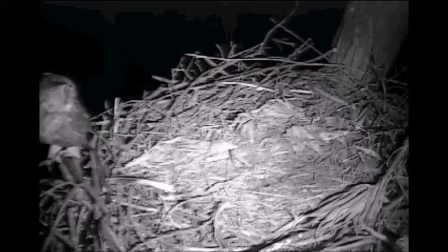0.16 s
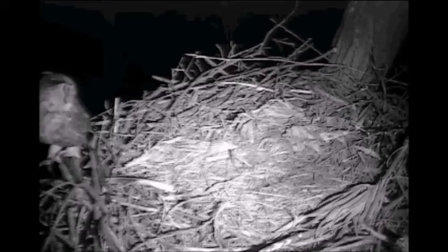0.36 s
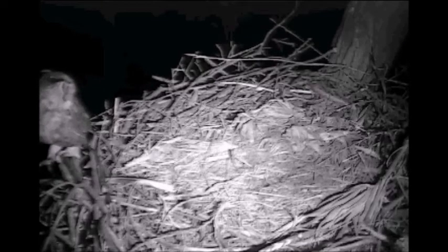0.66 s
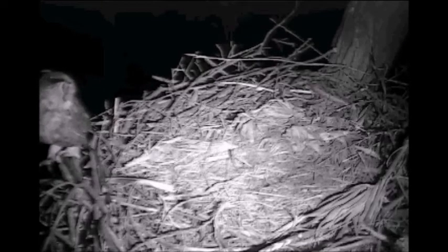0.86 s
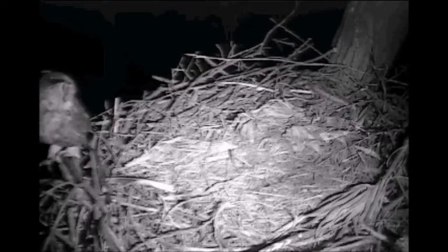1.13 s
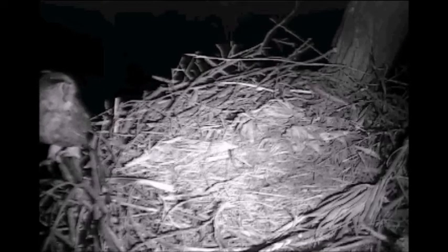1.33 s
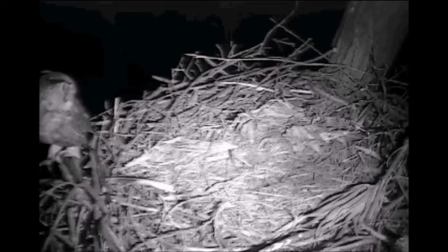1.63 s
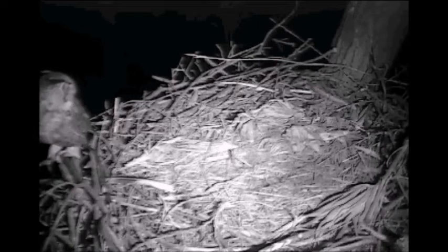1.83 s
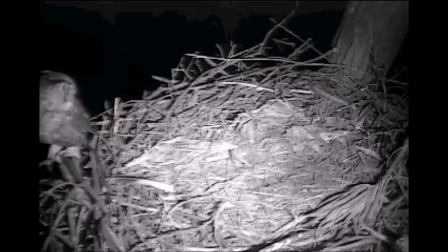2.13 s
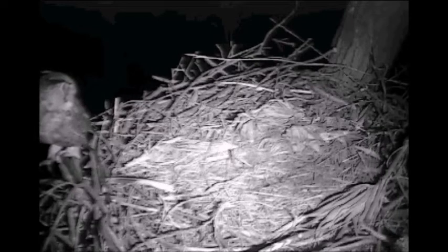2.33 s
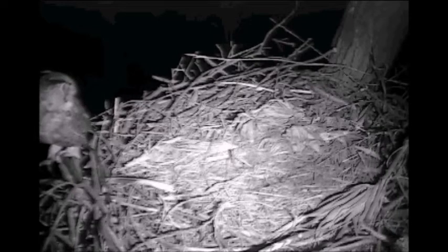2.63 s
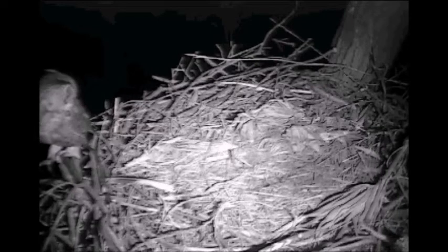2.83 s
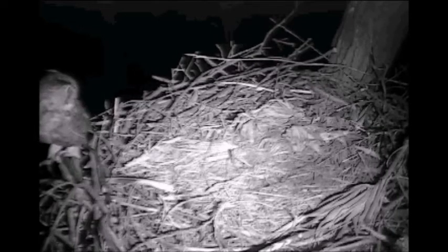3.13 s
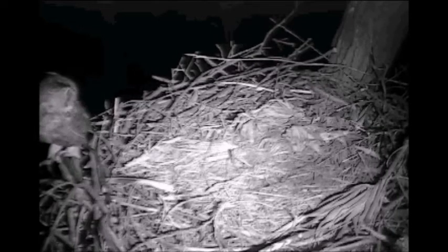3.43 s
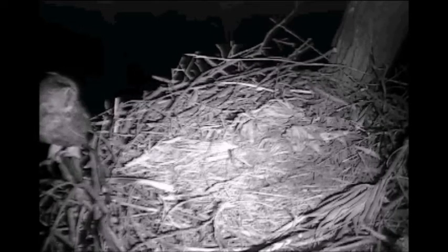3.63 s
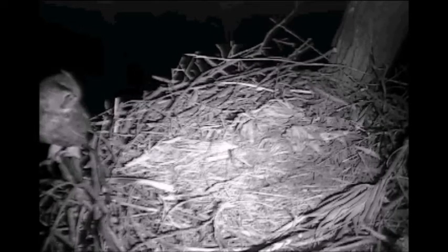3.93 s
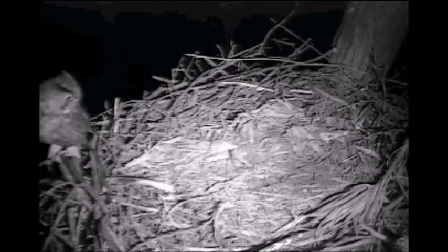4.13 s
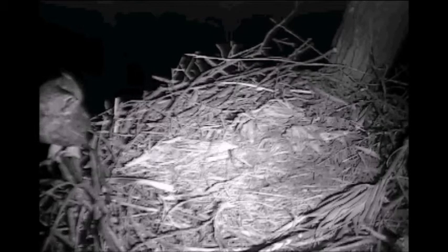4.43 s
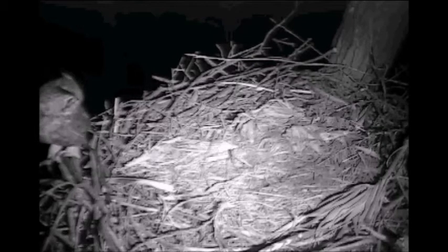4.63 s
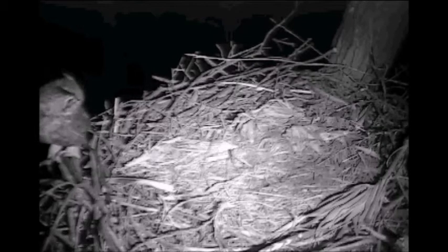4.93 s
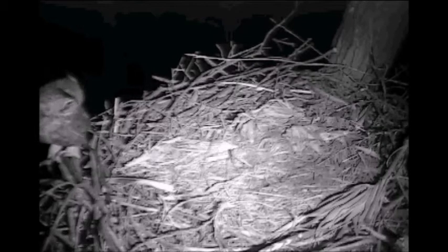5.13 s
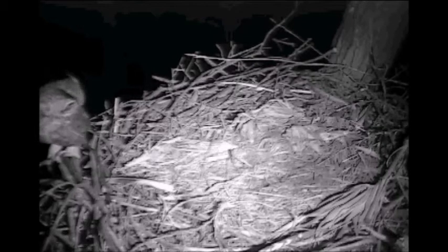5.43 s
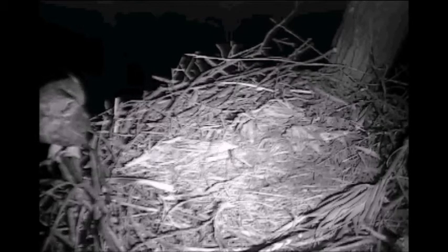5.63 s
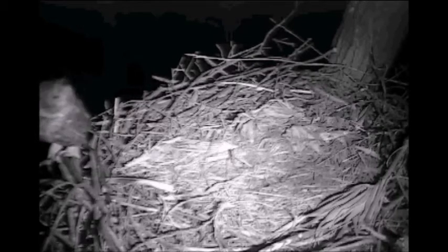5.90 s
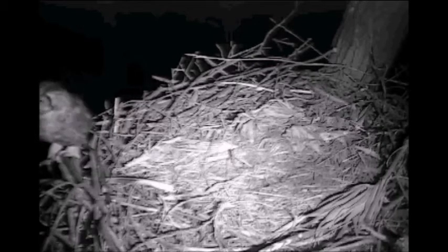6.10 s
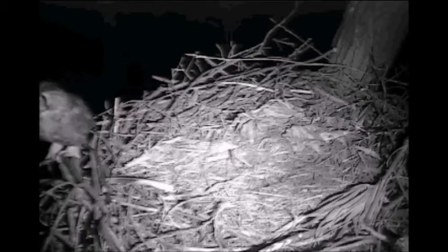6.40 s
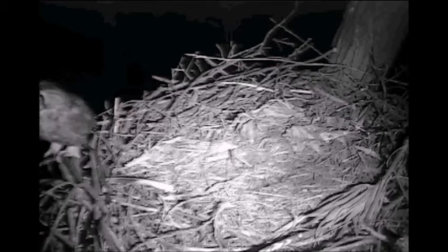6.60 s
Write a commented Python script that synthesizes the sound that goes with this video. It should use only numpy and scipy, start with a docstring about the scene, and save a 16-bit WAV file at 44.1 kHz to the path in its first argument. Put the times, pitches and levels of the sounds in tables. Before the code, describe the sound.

Steady buzzing hum and dull hiss from a cheap nest microphone, almost entirely in the left channel. After about a second an owl calls close by, low, round, nearly pure notes: one short, one short joined to one longer, a pause, a swelling rough hoot ending in a squeak, a pause, and a final long hoot. Trees return a faint tail and weak echoes; then only buzz and noise remain.

```python
"""Owl hooting at a nest camera

A great horned owl hoots five times at night beside its nest, heard through a nest camera's microphone.
Each hoot is an arching, nearly pure tone with a weak octave; in the loudest a second tone climbs away,
beating with it, and a thin squeak sounds near its end. The trees return a faint tail and a few echoes.
The camera line buzzes and hisses, and only its left channel carries the microphone."""
import sys
import numpy as np
from scipy import signal
from scipy.fft import rfft, irfft
from scipy.io import wavfile
from scipy.ndimage import uniform_filter1d

SR = 44100
rng = np.random.default_rng(int(sys.argv[2]) if len(sys.argv) > 2 else 0)


def unload_audio(sound):
    """Save the sound as a 16-bit wav file, at the path given as the first command line argument."""
    columns = np.transpose(np.atleast_2d(sound))
    # keep every value between -1 and 1, then stretch to whole-number steps
    steps = np.round(np.clip(columns, -1, 1) * 32767)
    wavfile.write(sys.argv[1], SR, steps.astype(np.int16))


N = 298084
TIME = np.arange(N) / SR  # seconds
# In every table and setting, levels on the left channel are those before the preamp.


def gain_of(db):
    """Turns decibels into amplitude."""
    return 10 ** (np.asarray(db) / 20)


def tone(turns):
    """A sine of rms 1, from its count of cycles so far."""
    return np.sqrt(2) * np.cos(2 * np.pi * turns)


def noise(spectrum):
    """Random noise of rms 1, shaped so that some pitches are stronger than others."""
    hz, db = np.transpose(spectrum)
    bins_hz = np.fft.rfftfreq(N, 1 / SR)
    shape_db = np.interp(np.log(bins_hz + 1), np.log(hz), db)
    shaped = irfft(rfft(rng.standard_normal(N)) * gain_of(shape_db), N)
    return shaped / shaped.std()


def waver(rate_hz):
    """A random drift of rms 1: noise that keeps only its slow part, up to about rate_hz."""
    keep_slow = np.exp(-(np.fft.rfftfreq(N, 1 / SR) / rate_hz) ** 2)
    drift = irfft(rfft(rng.standard_normal(N)) * keep_slow, N)
    return drift / drift.std()


def glide(s, values):
    """A curve through the points, its corners rounded."""
    return uniform_filter1d(np.interp(TIME, s, values), size=300)


def swell(s, db):
    """An amplitude curve through the points, silent outside them, its edges softened."""
    inside = (TIME > s[0]) * (TIME < s[-1])
    return uniform_filter1d(gain_of(np.interp(TIME, s, db)) * inside, size=200)


def bump(s, width_s):
    """A smooth bell of height 1 in time."""
    return np.exp(-((TIME - s) / width_s) ** 2)


def strength(x):
    """The rms level of a tone, averaged over about two cycles of a hoot."""
    return np.sqrt(abs(uniform_filter1d(x ** 2, size=300)))


FIELD_HZ, FIRST_TICK_S = 59.94, .0142  # video field rate, and the time of the first tick


def field_turns():
    return (TIME - FIRST_TICK_S) * FIELD_HZ


BUZZ_PARTIALS = [(1, -72), (2, -63.5), (3, -56), (4, -55.5), (5, -55), (6, -56), (7, -59), (8, -63.5),
                 (9, -59.5), (10, -63.5), (11, -67)]
# Mains hum. Each row: multiple of the mains rate, level in dB rms, a time in seconds when it
# lines up with the buzz.
MAINS_PARTIALS = [(2, -73.5, 3.3), (3, -61, 2.65), (4, -66.5, 3.32), (5, -59, 3.2), (6, -68, 5.4),
                  (7, -65, 4.4)]
# Whines of the electronics. Each row: pitch in Hz, level in dB rms before the shared cut.
WHINES = [(2099, -76.5), (4199, -73.5), (7617, -79), (8016, -76), (8393, -85.5), (10864, -100)]
MAINS_HZ = 60.027  # slightly faster than the field, so each partial beats slowly with the buzz


def buzz(unsteady=0.18, whine_db=-3):
    """One soft tick each video field, the mains hum beating against it, and thin steady whines."""
    turns = field_turns()
    ticks = sum(gain_of(db) * tone(round(k) * turns) for k, db in BUZZ_PARTIALS)
    hum = 0
    for k, db, together_s in MAINS_PARTIALS:
        mains_turns = turns + (MAINS_HZ - FIELD_HZ) * (TIME - together_s)
        hum = hum + gain_of(db) * tone(round(k) * mains_turns)
    whines = sum(gain_of(db + whine_db) * tone(hz * TIME + rng.random()) for hz, db in WHINES)
    return ticks * (1 + unsteady * waver(25)) + hum + whines


# Colour of the steady night noise. Each row: frequency in Hz, relative level in dB per Hz.
NIGHT_COLOUR = [(25, -31), (90, -24), (160, -11.5), (260, -4), (400, 0), (520, 1.5), (640, 1), (760, -6.5),
                (1000, -16.5), (1500, -19.5), (2600, -22), (4200, -23), (6500, -32), (10500, -42.5)]
# Colour of the pulsing hiss. Each row: frequency in Hz, relative level in dB per Hz.
HISS_COLOUR = [(1500, -8.5), (2700, -5), (3400, 1.5), (5000, 0), (6000, -6), (7500, -7), (10300, -7.5),
               (10900, -31.5)]
# Colour of its high fizz. Each row: frequency in Hz, relative level in dB per Hz.
FIZZ_COLOUR = [(3000, -28), (7400, -14.5), (8150, 0.5), (8500, 3.5), (8900, -0.5), (9400, 1), (10300, -6.5),
               (10900, -25.5)]


def background(night_db=-48.0, drift_db=0.65, hiss_db=-61.0, fizz_db=-67,
               throb=0.41, burst=1.7, sputter=0.22):
    """Dull night noise; amplifier hiss swells twice in each field cycle, and fizz spurts at each crest."""
    night = gain_of(night_db + drift_db * waver(4)) * noise(NIGHT_COLOUR)
    pulse = -np.cos(4 * np.pi * field_turns())
    hiss = gain_of(hiss_db) * noise(HISS_COLOUR) * (1 + throb * pulse)
    spurts = burst * (pulse > .5) * (1 + sputter * waver(100))
    fizz = noise(FIZZ_COLOUR) * (1 + spurts)
    return night + hiss + gain_of(fizz_db) * fizz / fizz.std()


# Colour of the idle channel. Each row: frequency in Hz, relative level in dB per Hz.
IDLE_COLOUR = [(20, -8), (100, -9.5), (250, -0.5), (500, -1), (900, -11), (2000, -8.5), (4000, -4),
               (6000, -9), (10200, -13), (10900, -24)]


def idle_channel(idle_db=-66.0):
    """Faint steady noise on the channel with no microphone."""
    return gain_of(idle_db) * noise(IDLE_COLOUR)


# Brief dips in the longer hoots. Each row: time in seconds, half width in seconds, drop in level
# in dB, drop in pitch in Hz.
BRIEF_DIPS = [(1.76, 0.013, 5, 26.5), (1.824, 0.0089, 3.5, 16.5), (2.814, 0.0066, 6.5, 6.5),
              (2.859, 0.013, 2.5, 0.5), (3.069, 0.0049, 7.5, 20), (3.779, .014, 7, 6)]
SLACK_HZ, SLACK_DB, SLACK_CURVE = 222.2, -21.5, 1.48  # with little pressure a hoot is low and soft
LOWEST_HZ = 187.9
FADE_DB_PER_S, SAG_HZ_PER_S = 19, 32  # the bird runs out of air through each hoot
PUSH_S, PUSH_WIDTH_S, PUSH_DB = 2.897, 0.1, 8.4  # one hard push swells the fourth hoot
# after each dip the level briefly swells: share of the level drop, and its delay in half widths
REBOUND, REBOUND_WIDTHS = 0.34, 1.95


def pressure(start, end, top_hz, level_db, rise_s, fall_s, pitch_widening=1.3):
    """Air pressure builds and lets go, moving pitch (Hz) and amplitude together; also returns the slack."""
    t = np.clip(TIME, start - .1, end + .1)
    slack = np.exp((start - t) / rise_s) + np.exp((t - end) / fall_s)  # about 1 at either end
    late_s = t - (start + end) / 2
    hz = top_hz + (SLACK_HZ - top_hz) * slack - SAG_HZ_PER_S * late_s
    db = level_db + SLACK_DB * slack ** SLACK_CURVE - FADE_DB_PER_S * late_s
    db = db + PUSH_DB * bump(PUSH_S, PUSH_WIDTH_S)
    for s, width, drop_db, drop_hz in BRIEF_DIPS:
        hz = hz - drop_hz * bump(s, pitch_widening * width)  # the pitch dips for longer than the level
        rebound = REBOUND * bump(s + REBOUND_WIDTHS * width, width)
        db = db - drop_db * (bump(s, width) - rebound)
    return np.maximum(hz, LOWEST_HZ), gain_of(db), slack


# Faint upper harmonics. Each row: multiple of the pitch, level in dB relative to the fundamental.
UPPER_HARMONICS = [(3, -38), (4, -44)]
# The throat favours the octave as it sweeps through its resonance. Each row: octave pitch in Hz,
# level in dB before each hoot's own boost and fade.
THROAT_RESONANCE = [(390, -39), (450, -38.5), (500, -34.5), (560, -31.5), (598, -34), (630, -39.5)]
OCTAVE_FADE_DB_PER_S = 13  # the voice also dulls through each hoot


def hoot(start, end, top_hz, level_db, rise_s, fall_s, octave_db,
         jitter=0.0042, shimmer=0.046, octave_pulse=0.38, upper_pulse=0.94, strain=3.0, release_db=-9):
    """An arching tone from the syrinx; the swollen throat passes little but fundamental and octave."""
    hz, effort, slack = pressure(start, end, top_hz, level_db, rise_s, fall_s)
    turns = np.cumsum(hz * (1 + jitter * waver(70))) / SR
    # in the microphone, the buzz makes the harmonics pulse in step with it
    field = 2 * np.pi * field_turns()
    # the harmonics break up when the bird pushes hard
    rough = strain * effort ** 2 * waver(120)
    upper = sum(gain_of(db) * tone(round(k) * turns + rough) for k, db in UPPER_HARMONICS)
    upper = upper * (1 + upper_pulse * np.cos(2 * field))
    octave = tone(2 * turns + 0.24 + rough) * (1 + octave_pulse * np.cos(field))
    throat_db = np.interp(2 * hz, *np.transpose(THROAT_RESONANCE))
    octave *= gain_of(octave_db + throat_db + release_db * np.maximum(slack - 1, 0))
    octave *= gain_of(-OCTAVE_FADE_DB_PER_S * (np.clip(TIME, start, end) - (start + end) / 2))
    voice = effort * (tone(turns) + upper) * (1 + shimmer * waver(110)) + octave
    pushed = start < PUSH_S < end
    return voice + second_tone(turns) if pushed else voice


SECOND_START_S, SECOND_END_S, SECOND_DB = 2.826, 3.02, -19  # the push wakes a second tone
GAP_HZ, BREAK_S, CLIMB_HZ_PER_S = 22, 2.96, 958  # it sits just above the hoot, then breaks away upward


def second_tone(turns, octave_db=-23, arch=0.41, lead=0.81):
    """Sits above the hoot, then climbs away, so the two beat faster and faster."""
    t = TIME - BREAK_S
    climb = .5 * CLIMB_HZ_PER_S * np.maximum(t, 0) ** 2
    own = turns + lead + GAP_HZ * t + climb
    along = np.clip((TIME - SECOND_START_S) / (SECOND_END_S - SECOND_START_S), 0, 1)
    level = gain_of(SECOND_DB) * uniform_filter1d((1 - (2 * along - 1) ** 2) ** arch, size=400)
    return level * (tone(own) + gain_of(octave_db) * tone(2 * own))


# Thin squeak near the end of the loudest hoot. Each row: time in seconds, pitch in Hz, level in dB.
SQUEAK_PATH = [(2.984, 1820, -65.5), (3.011, 2170, -56.5), (3.032, 2010, -54), (3.047, 1900, -52),
               (3.062, 1860, -70)]
# Hoarse edge of the squeak. Each row: frequency in Hz, relative level in dB per Hz.
HOARSE_COLOUR = [(1200, -30.5), (1750, -2), (2250, -1.5), (2800, -30), (6000, -62)]


def squeak(jitter=0.02, shimmer=.3, hoarse_db=-63):
    """A thin whistle that rises and falls inside a short hoarse rush."""
    s, hz, db = np.transpose(SQUEAK_PATH)
    turns = np.cumsum(glide(s, hz) * (1 + jitter * waver(300))) / SR
    whistle = swell(s, db) * tone(turns) * (1 + shimmer * waver(250))
    rush = swell(s, np.full(len(s), hoarse_db)) * noise(HOARSE_COLOUR)
    return whistle + rush


# The hoots. Each row: start in seconds, end in seconds, top pitch in Hz before sag and dips, level
# in dB before fade, push and dips, rise in seconds, fall in seconds, octave boost in dB,
# level of the rush of air in dB relative to the tone.
HOOT_CALLS = [ (1.214, 1.314, 306.3, -21.5, .0156, .024, 0.7, -20.5),
              (1.572, 1.663, 306.2, -20, 0.014, 0.018, 2.5, -22),
              (1.685, 1.922, 299.5, -22.5, .018, 0.0272, -0.2, -22),
              (2.763, 3.093, 314.5, -22, .037, .018, 0.5, -22),
              (3.554, 3.836, 303, -21.5, .023, 0.021, -0.9, -21.5), ]
# Air rushing in the throat. Each row: frequency in Hz, relative level in dB per Hz.
AIR_COLOUR = [(60, -20), (200, -5), (480, 4.5), (700, -5), (950, -14.5), (1400, -17.5), (2000, -27),
              (2700, -38), (5000, -44)]


def owl():
    """The hoots and the squeak; each hoot carries a rush of air that follows its strength."""
    air, voice = noise(AIR_COLOUR), squeak()
    for *shape, air_db in HOOT_CALLS:
        call = hoot(*shape)
        voice = voice + call + gain_of(air_db) * strength(call) * air
    return voice


# Rasp of the microphone under a loud tone. Each row: frequency in Hz, relative level in dB per Hz.
RASP_COLOUR = [(40, -21), (300, 15.5), (800, -12), (1300, -6.5), (1750, 1.5), (2500, -6), (3100, -10),
               (4500, -16.5), (7000, -27), (10000, -40)]
# Brighter crackle on the highest peaks. Each row: frequency in Hz, relative level in dB per Hz.
CRACKLE_COLOUR = [(100, -4.5), (1500, 0.5), (3200, -4), (4400, -0.5), (6000, -10.5), (10000, -27)]


def overload(x, rasp_db=-23, steepness=1.8, crackle_db=-51, sparse=0.56):
    """The microphone rasps under a loud tone, and crackles mostly where it is loudest."""
    level = strength(x)
    rasp = gain_of(rasp_db) * level ** steepness * noise(RASP_COLOUR)
    near_peak = (level / level.max()) ** 6
    crackle = gain_of(crackle_db) * near_peak * noise(CRACKLE_COLOUR) * (1 + sparse * waver(500))
    return x + rasp + crackle


def gain_control(x, threshold_db=-20, squeeze=0.15, recovery_db=9):
    """A loud hoot turns the gain down a little; the held level then falls by recovery_db each second."""
    fall = recovery_db * TIME
    held_db = np.maximum.accumulate(20 * np.log10(strength(x) + 1e-9) + fall) - fall
    return x / gain_of(squeeze * np.maximum(held_db - threshold_db, 0))


# Distinct returns from the surroundings. Each row: delay in seconds, level in dB relative to the voice.
ECHO_RETURNS = [(.1356, -21), (.1483, -30), (.39, -35)]


def trees(x, t60=1.0, tail_db=-31):
    """Trunks scatter a thin tail, dying by 60 dB in t60 seconds; larger surfaces give distinct echoes."""
    t = TIME[:SR]
    scattered = rng.standard_normal(SR) * (rng.random(SR) < 1500 / SR)  # about 1500 returns a second
    taps = scattered * gain_of(-60 * t / t60) * (t > .03)
    taps *= gain_of(tail_db) / np.linalg.norm(taps)
    echoes = sum(gain_of(db) * np.interp(TIME - s, TIME, x) for s, db in ECHO_RETURNS)
    return signal.fftconvolve(x, taps)[:N] + echoes


def scene():
    """The owl and the trees at one microphone, wired to the left channel."""
    voice = owl()
    return np.array([voice + trees(voice), np.zeros(N)])


def record(dry, preamp_db=6, edge_hz=10900):
    """Microphone overload, the buzz and hiss of the line, gain control, preamp, then the band limit."""
    line = overload(dry[0]) + buzz() + background()
    left = gain_of(preamp_db) * gain_control(line)
    right = dry[1] + idle_channel()
    low_pass = signal.firwin(1023, edge_hz, window=("kaiser", 9), fs=SR)
    return signal.oaconvolve(np.array([left, right]), low_pass[None], "same", axes=1)


dry = scene()
out = record(dry)
unload_audio(out)
```